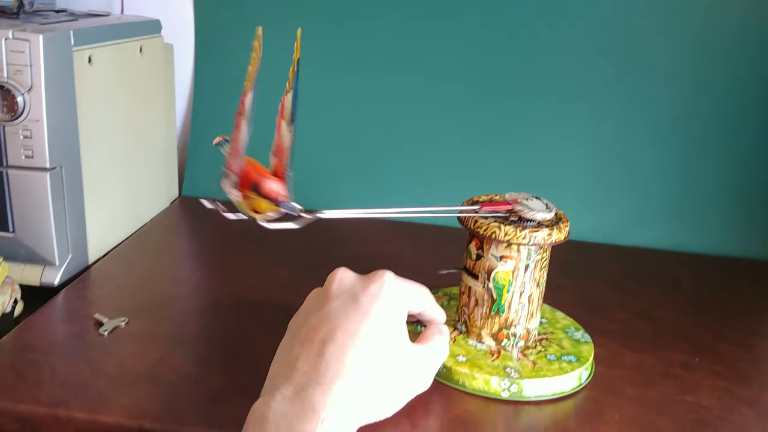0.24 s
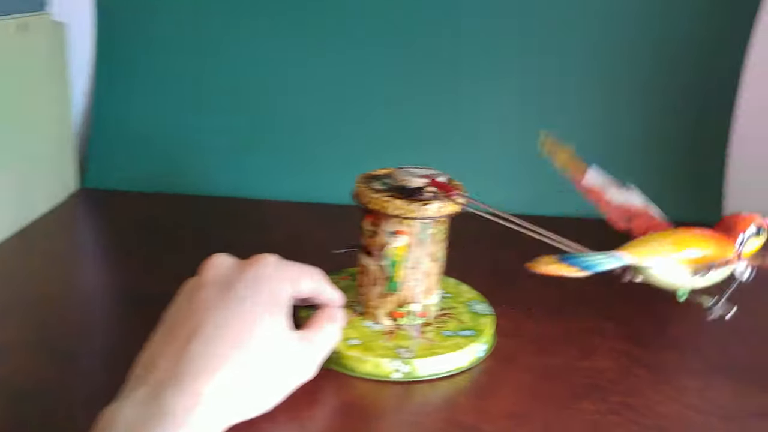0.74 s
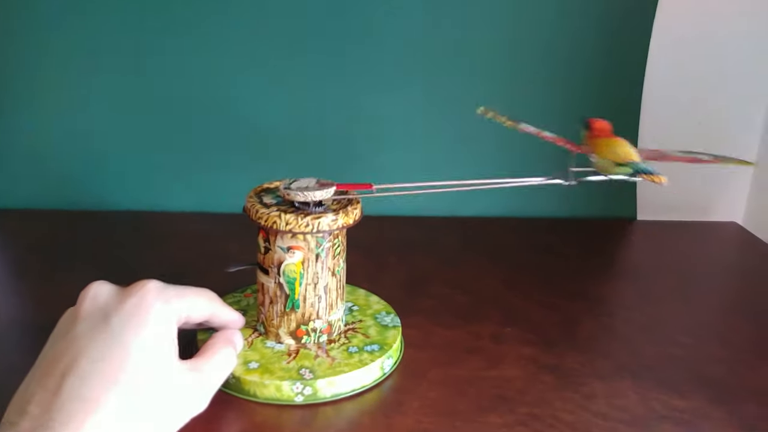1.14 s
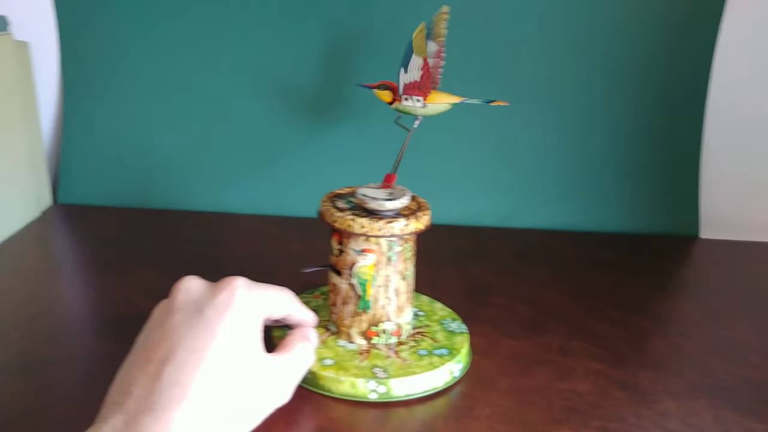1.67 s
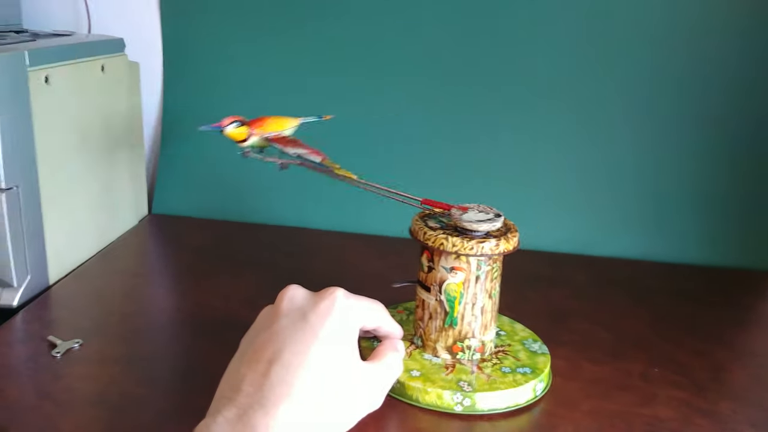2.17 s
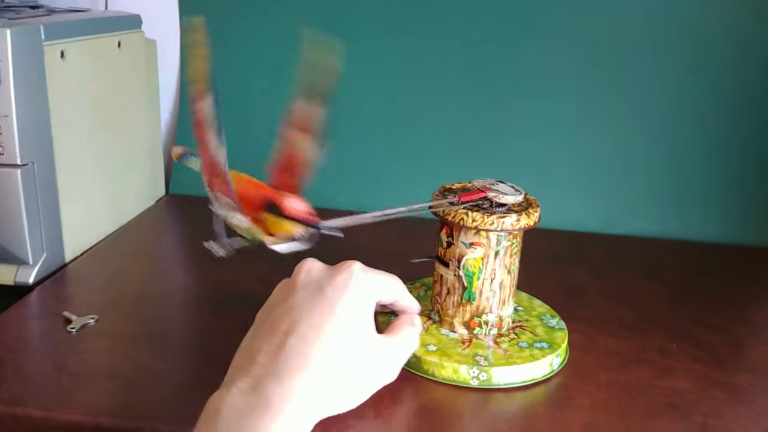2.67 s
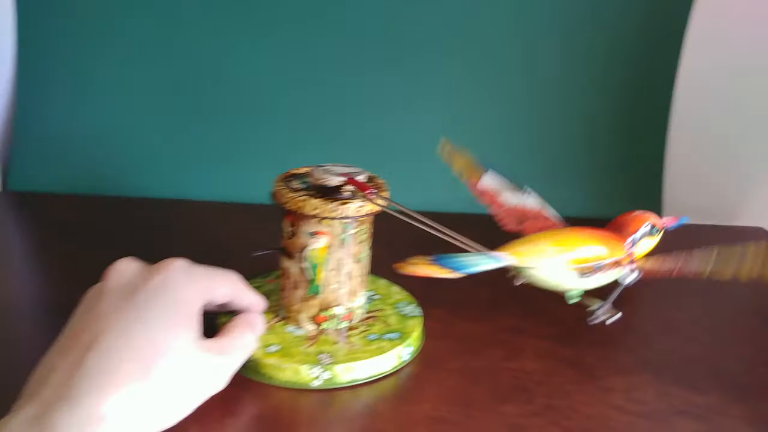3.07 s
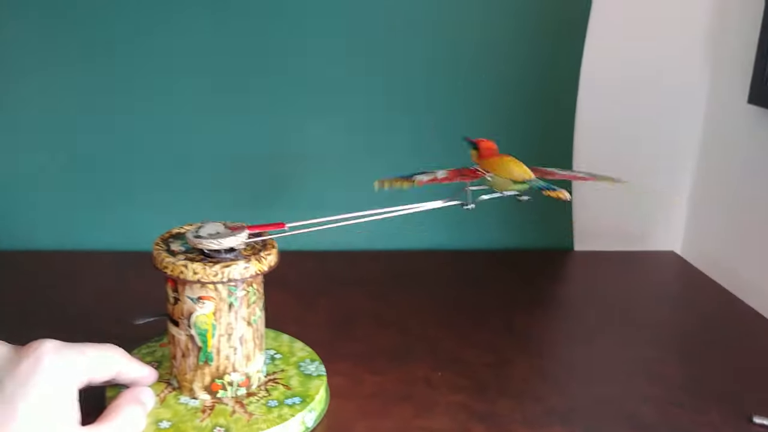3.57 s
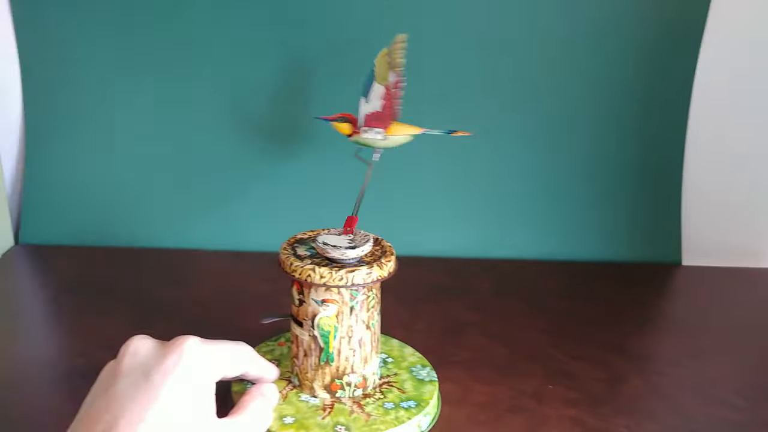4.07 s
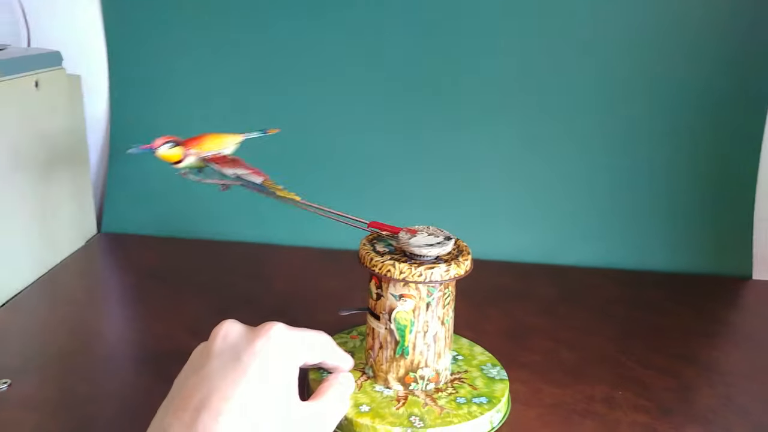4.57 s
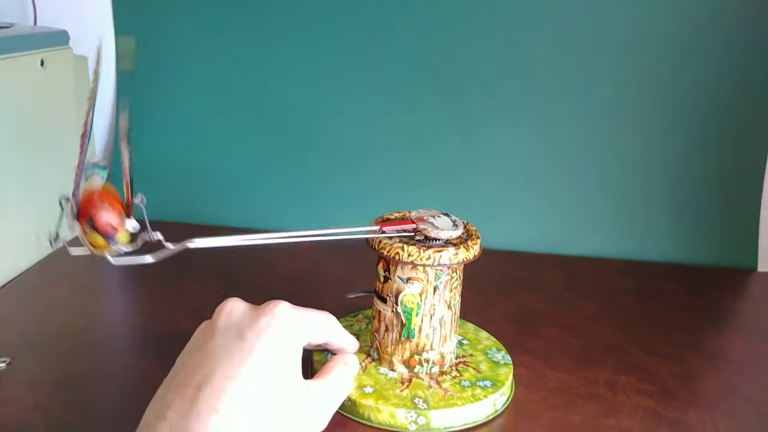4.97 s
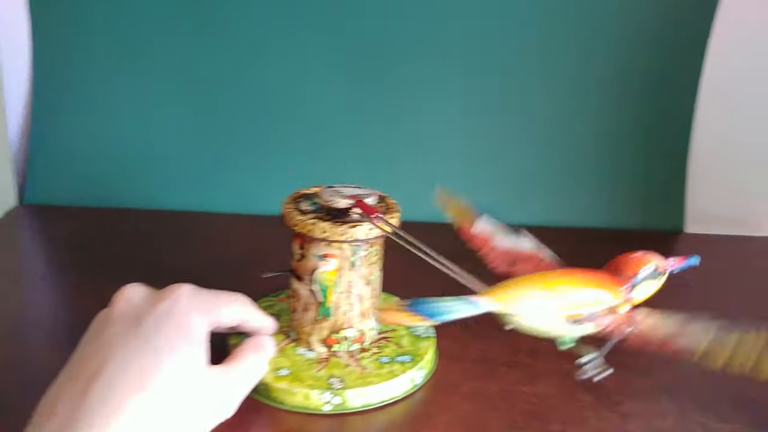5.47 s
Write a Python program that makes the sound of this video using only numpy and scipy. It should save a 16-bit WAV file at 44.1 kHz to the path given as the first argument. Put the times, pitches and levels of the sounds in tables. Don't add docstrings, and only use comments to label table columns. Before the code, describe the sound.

A clockwork tin bird circles a hollow drum on a wooden table. Its gears make a continuous dense, bright, rasping whirr that flutters several times a second, with sharp snaps and brief tinny rattles. A faint low hum comes and goes, sinking in pitch. Close stereo microphones favour the treble; the small room is quiet, with a faint low household drone.

```python
import sys
import numpy as np
from scipy import signal
from scipy.fft import rfft, irfft
from scipy.io import wavfile
from scipy.ndimage import uniform_filter1d, map_coordinates

SR = 44100
rng = np.random.default_rng(int(sys.argv[2]) if len(sys.argv) > 2 else 0)


def dump_mix(stems):
    frames = np.atleast_2d(stems).T
    limited = np.clip(frames, -1, 1)
    pcm = np.round(limited * 32767).astype(np.int16)
    wavfile.write(sys.argv[1], SR, pcm)


def magnitude_from_level(level_db):
    exponent = np.asarray(level_db, float) / 20
    return 10 ** exponent


N = 252693

# t/s, f/Hz
TOOTH_RATE = [
    (0, 374),
    (.8, 371.3),
    (.93, 313.1),
    (1.35, 326.5),
    (2.7, 317.2),
    (2.85, 299.3),
    (4.4, 294.4),
    (4.8, 281),
    (5.73, 270.4),
]


def evened(x):
    return x / np.sqrt(np.mean(x ** 2) + 1e-20)


def read_curve(points, hz):
    f, value = np.transpose(points)
    return np.interp(np.log(hz + 1), np.log(f + 1), value, left=value[0], right=value[-1])


def colour(x, points):
    log_gain = read_curve(points, abs(np.fft.fftfreq(4096, 1 / SR))) * np.log(10) / 20
    taps = np.fft.ifft(np.exp(np.conj(signal.hilbert(log_gain)))).real[:2048]
    return evened(signal.oaconvolve(x, taps[None])[:, :N])


def resonate(x, hz, width):
    turn = np.exp(2j * np.pi * np.cumsum(hz * np.ones(x.shape[-1])) / SR)
    r = np.exp(-np.pi * width / SR)
    return 2 * (turn * signal.lfilter([1 - r], [1, -r], x / turn)).real


def ring_tin(x, modes):
    total = 0
    for k, (hz, width, db) in enumerate(modes):
        tone = resonate(resonate(x, hz, 1.3 * width), hz, 1.3 * width)
        total = total + (-1) ** k * magnitude_from_level(db) * evened(tone)
    return evened(total)


def alike(pair):
    # f/Hz, share from 0 to 1
    likeness = [(60, 0.77), (290, 0.82), (640, 0.55), (1410, 0.36), (3100, 0.013), (6000, 0.0052)]
    left, right = rfft(pair)
    same = np.clip(read_curve(likeness, np.fft.rfftfreq(N, 1 / SR)), 0, 1)
    return irfft([left, same * left + np.sqrt(1 - same ** 2) * right], N)


def room_air():
    # f/Hz, level/dB per Hz
    wash_curve = [(15, -46), (36, -35), (50, -23), (71, 4.5), (135, -4), (194, -2.5), (301, 2), (518, -6.5),
                  (600, 0), (780, -51), (1320, -120)]
    # f/Hz, width/Hz, level/dB
    drone_modes = [(72.4, 16, -61), (97.2, 17, -66.5), (132, 47, -62), (251, 6.9, -68)]
    noise = alike(rng.standard_normal((2, N)))
    air = magnitude_from_level(-56) * colour(noise, wash_curve + [(2000, -44), (5000, -79)])
    for hz, width, db in drone_modes:
        air += magnitude_from_level(db) * evened(resonate(resonate(noise, hz, width), hz, width))
    return air


def side(mean_db, once_db, once_top, twice_db, twice_top):
    front_s, round_s, slowing = 0.42, 2.29, 0.013
    t = np.arange(N) / SR - front_s
    rounds = t * (1 - slowing * t / 2) / round_s
    once = once_db * np.cos(2 * np.pi * (rounds - once_top))
    twice = twice_db * np.cos(4 * np.pi * (rounds - twice_top))
    return mean_db + once + twice


def bumps(s, db, half):
    t = np.arange(0, N + 64, 64) / SR
    swell = db[:, None] * np.exp(-.5 * ((t - s[:, None]) / half) ** 2)
    return np.interp(np.arange(N) / SR, t, swell.sum(0))


def tooth_force():
    # t/s, level/dB
    effort = [(0.0, -29), (0.38, -24.5), (0.76, -30), (1.15, -22), (1.53, -29.5), (1.91, -26.5),
              (2.29, -31.5), (2.67, -25), (3.06, -24.5), (3.44, -21), (3.82, -27), (4.2, -28.5),
              (4.58, -23.5), (4.97, -23.5), (5.35, -25.5), (5.73, -24)]
    # t/s, level/dB, half length/s
    slacks = [(0.147, -5.5, 0.0097), (0.288, -6.5, 0.013), (1.0, -3, 0.0095), (1.134, -5, 0.011),
              (1.209, -4.5, 0.021), (1.441, -6, 0.0059), (1.516, -5.8, 0.012), (1.768, -3.5, 0.0092),
              (1.965, -6, 0.01), (2.051, -8, 0.01), (2.12, -3, 0.0068), (2.491, -6, 0.0085),
              (2.557, -6.5, 0.0072), (2.967, -5, 0.0038), (3.099, -9, 0.012), (3.261, -7, 0.01),
              (3.343, -8.5, 0.012), (3.479, -4.5, 0.012), (3.562, -5, 0.014), (3.799, -5.5, 0.0081),
              (3.884, -7.5, 0.017), (3.975, -8.5, 0.014), (4.438, -3.5, 0.01), (4.52, -5, 0.03),
              (4.734, -7.5, 0.023), (4.808, -5.5, 0.012), (4.887, -4.5, 0.018), (4.945, -7, 0.022),
              (5.518, -6.5, 0.013), (5.694, -8, 0.0079)]
    # t/s, level/dB, half length/s
    binds = [(0.259, 2.5, 0.0053), (0.482, 3.5, 0.024), (0.55, 3.5, 0.021), (0.601, 6, 0.0073),
             (0.656, 5, 0.027), (0.722, 6.5, 0.014), (0.799, 5, 0.03), (0.957, 3.5, 0.008),
             (1.288, 2.5, 0.018), (1.666, -0.5, 0.0057), (1.728, 2, 0.0082), (1.793, 1.5, 0.0061),
             (2.005, 3, 0.02), (2.076, -0.5, 0.007), (2.2, 6, 0.041), (2.293, 5.5, 0.01), (2.644, 3, 0.007),
             (2.744, 4.0, 0.0071), (2.871, 7, 0.0037), (2.928, 4.5, 0.01), (3.068, 3.5, 0.0065),
             (3.699, 3, 0.0079), (4.198, 1.5, 0.049), (4.542, 3.5, .007), (4.61, 1.5, 0.0084),
             (5.062, 1, 0.012), (5.209, 4.5, 0.011), (5.275, 4.5, 0.017), (5.357, 5, 0.019),
             (5.418, 3, 0.0086)]
    s, db, half = np.transpose(slacks + binds)
    drive_db = np.interp(np.arange(N) / SR, *np.transpose(effort))
    return magnitude_from_level(drive_db + 1.07 * bumps(s, db, half[:, None]) + 1.5)


def scatter(knocks, near_db, t60, size=4096):
    n = np.arange(N)
    left_lag = -1.6 + 2.08 * np.cos(2 * np.pi * (n / SR + 0.22) / 2.318)
    near = np.array([map_coordinates(knocks, [n - left_lag]), knocks])
    pieces = np.lib.stride_tricks.sliding_window_view(np.pad(knocks, size), size)[::size // 2]
    pieces = pieces * np.sqrt(signal.windows.hann(size, sym=False))
    fade = magnitude_from_level(-60 * np.arange(size // 2) / SR / t60)
    path = rfft(rng.standard_normal((len(pieces), 2, size // 2)) * fade)
    path = irfft(path / np.sqrt(uniform_filter1d(abs(path) ** 2, size=9)))
    heard = signal.fftconvolve(pieces[:, None], path, axes=2)
    echoes = np.zeros((2, N + 4 * size))
    for k, piece in enumerate(heard):
        echoes[:, k * size // 2:][:, :piece.shape[1]] += piece
    return magnitude_from_level(near_db) * evened(near) + evened(alike(echoes[:, size:size + N]))


def teeth(force, per_s=1700, spread_db=4.0, snap_db=18.0, bunching=.65):
    # t/s, peak level/dB
    snaps = [(0.2376, -32), (0.3014, -14), (0.4723, -14), (0.5282, -12.5), (0.7008, -24), (1.2635, -34),
             (1.6709, -29), (1.7939, -20), (1.9779, -37), (2.049, -18), (2.0752, -14.5), (2.1385, -18),
             (2.3857, -18.5), (2.4339, -18), (2.9107, -23), (3.1227, -25), (3.2781, -15), (3.3558, -13.5),
             (4.039, -45), (4.2707, -17), (4.3368, -24), (4.472, -13), (4.5437, -17), (4.585, -26),
             (4.6389, -57), (4.9103, -15.5), (4.9631, -20), (5.1243, -15), (5.5333, -16), (5.6391, -24)]
    s, hz = np.transpose(TOOTH_RATE)
    meet = np.cos(2 * np.pi * np.cumsum(np.interp(np.arange(N) / SR, s, hz)) / SR)
    size = magnitude_from_level(spread_db * np.minimum(rng.exponential(1, N), 3.5)) * rng.choice([-1., 1.], N)
    struck = rng.random(N) < (1 + bunching * meet) * per_s / SR
    knocks = evened(size * struck)
    knocks /= np.sqrt(uniform_filter1d(knocks ** 2, size=1500))
    s, db = np.transpose(snaps)
    at = (s * SR).astype(int)
    knocks[at] += magnitude_from_level(db + snap_db) / force[at]
    return scatter(knocks, near_db=-8.0, t60=0.069)


def tin_body(knocks):
    # f/Hz, width/Hz, level/dB
    plate_modes = [(1338, 88, -12), (1513, 40, -12.5), (2197, 140, -9), (2320, 86, 3), (2490, 49, -8.5),
                   (2678, 40, -0.5), (2837, 110, -6), (3247, 55, -7), (3680, 33, -15.5)]
    # f/Hz, width/Hz, level/dB
    drum_modes = [(623, 41, 1.5), (649, 138, 10), (814, 243, 3.5), (891, 36.5, 9), (1215, 300, 7.5)]
    # t/s, plate level/dB, drum level/dB
    jolts = [(.48, 9, 7), (.535, 6.5, 8), (.81, 1, 6), (1.03, 9.5, 7.5), (1.165, 5, 7.5), (1.47, -2, 9.5),
             (2.0, 10, -12), (2.09, 0.5, 8), (2.64, 2.5, 0), (2.81, 10, -7), (3.12, -6, 10),
             (3.295, -15, 5.5), (3.44, -6, 5), (4.19, 3, 6), (4.46, 2, 2), (4.6, 2, -22), (4.845, 0, -5),
             (5.2, 4, 2), (5.27, 0, 8), (5.42, 3, 13)]
    jolt_s = 0.014
    s, plate_db, drum_db = np.transpose(jolts)
    plate_level = magnitude_from_level(0.5 + side(-19, 4, -0.2, -0.2, -.3) + bumps(s, plate_db, jolt_s))
    drum_level = magnitude_from_level(side(-21.5, 4, 0.5, 1.6, -.19) - 6.5 + bumps(s, drum_db, jolt_s))
    return plate_level * ring_tin(knocks, plate_modes) + drum_level * ring_tin(knocks, drum_modes)


def bare_knocks(knocks, force):
    # f/Hz, level/dB per Hz
    chatter = [(350, -32), (600, -22), (1250, -26), (1700, -26.5), (2100, -19.5), (3000, -17.5),
               (4340, -15.5), (4900, -11), (6000, -7), (7400, 2), (8300, -8), (9600, -24), (10000, -31.5),
               (10400, -37), (12000, -66)]
    # f/Hz, level/dB per Hz
    fizz = [(10000, -33), (10900, -15), (11500, -6), (12000, -6), (13000, -1), (14000, -3.5), (15600, 2)]
    bare = colour(knocks, chatter)
    low = signal.sosfiltfilt(signal.butter(4, 4260, fs=SR, output="sos"), bare)
    steadier = (uniform_filter1d(force, size=3000) / force) ** 0.27
    bare += (magnitude_from_level(side(0.44, 1.07, -0.0094, 0.75, -0.114)) * steadier - 1) * low
    return magnitude_from_level(-1.63) * bare + magnitude_from_level(5.0 + side(-22, 1, 0.1, 1.8, -.1)) * colour(knocks, fizz)


def whirr():
    force = tooth_force()
    knocks = teeth(force)
    lasting = 0.75 * force + 0.059 * uniform_filter1d(force, size=6000)
    pan = magnitude_from_level(side(0.11, 0.55, 0.28, .4, 0.4) * np.array([[.5], [-.5]]))
    return (force * bare_knocks(knocks, force) + lasting * tin_body(knocks)) * pan


def mesh_hum(width=8.6):
    # start t/s, length/s, level/dB
    hums = [(0.01, 0.22, -52), (0.287, .12, -49), (0.46, 0.32, -53), (0.964, 0.36, -49.5),
            (1.306, 0.28, -54), (1.6, .45, -62.5), (2.45, .38, -56.5), (3.055, .17, -46.5),
            (3.243, 0.16, -53), (3.45, .17, -49.5), (4.12, .3, -56), (4.768, 0.34, -58), (5.26, 0.29, -54)]
    rise_s, fall_s = 0.025, 0.078
    t = np.arange(N) / SR
    hz = np.interp(t, *np.transpose(TOOTH_RATE))
    tone = np.sqrt(2) * np.sin(2 * np.pi * np.cumsum(hz) / SR)
    tone += 0.76 * evened(resonate(rng.standard_normal(N), hz, width))
    level = np.zeros(N)
    for s, length, db in hums:
        rise = (t - s) / rise_s + .5
        fall = (s + length - t) / fall_s + .5
        level += magnitude_from_level(db - 4.0) * np.clip(np.minimum(rise, fall), 0, 1)
    return level * tone


def slaps(ring_hz=7400, t60=.007, slap_db=4.5):
    # t/s, peak level/dB
    hard_slaps = [(0.4723, -16), (0.5344, -15), (1.6706, -16), (1.7933, -13), (2.0752, -10), (2.0824, -15),
                  (2.1395, -18), (2.9108, -17), (3.6022, -17), (3.6394, -15), (4.4717, -11), (4.5474, -11),
                  (4.6184, -10), (4.9112, -15), (4.9631, -17), (5.0594, -10)]
    t, hits = np.arange(600) / SR, np.zeros(N)
    s, db = np.transpose(hard_slaps)
    hits[(s * SR).astype(int)] = magnitude_from_level(db + slap_db)
    onset = 1 - np.exp(-t / 0.00034)
    ring = np.sin(2 * np.pi * ring_hz * t) * magnitude_from_level(-60 * t / t60) * onset
    return signal.oaconvolve(hits, ring)[:N]


def scene():
    return room_air() + whirr() + mesh_hum() + slaps() * np.array([[1], [.7]])


def band_limit(x):
    return signal.sosfilt(signal.butter(12, 17100, fs=SR, output="sos"), x)


def record(dry):
    # f/Hz, left-right level/dB
    port_curve = [(60, 3.5), (130, 3.0), (290, 3), (640, 5), (1410, -1.5), (3100, 4), (6820, 2.5),
                  (15000, 3)]
    bass_hz = 42
    hz = np.fft.rfftfreq(N, 1 / SR)
    ports = magnitude_from_level(read_curve(port_curve, hz) * np.array([[.5], [-.5]]))
    ports = ports / np.sqrt(1 + (bass_hz / (hz + 1)) ** 6)
    edge = signal.firwin(2047, [10400, 11080, 15760], window=("kaiser", 10), fs=SR)
    heard = signal.oaconvolve(irfft(rfft(dry) * ports, N), edge[None], "same")
    return band_limit(heard)


dry = scene()
out = record(dry)
dump_mix(out)
```